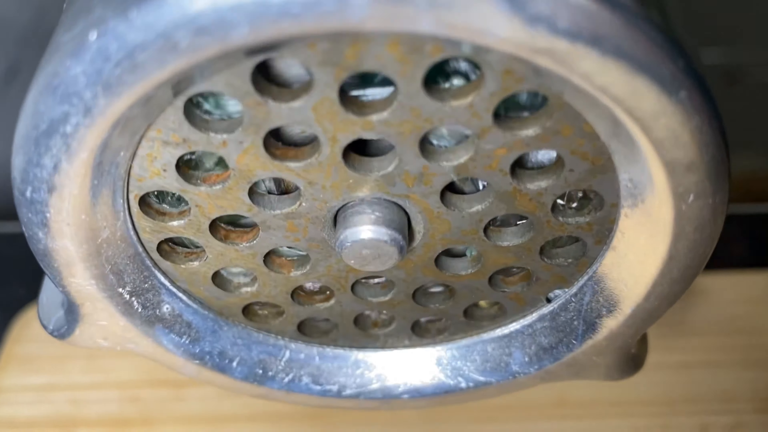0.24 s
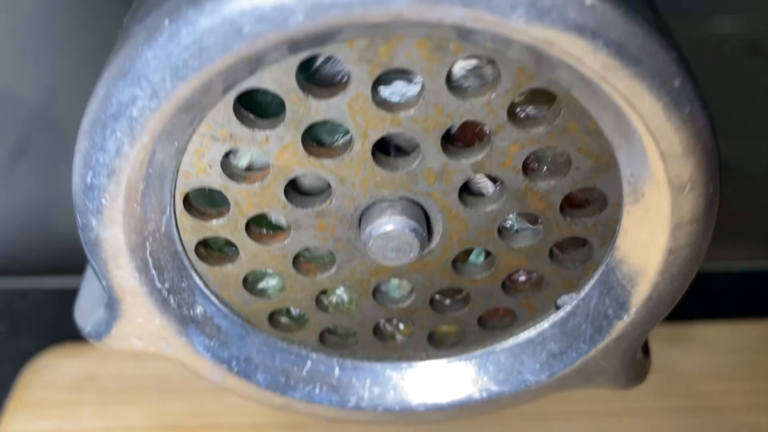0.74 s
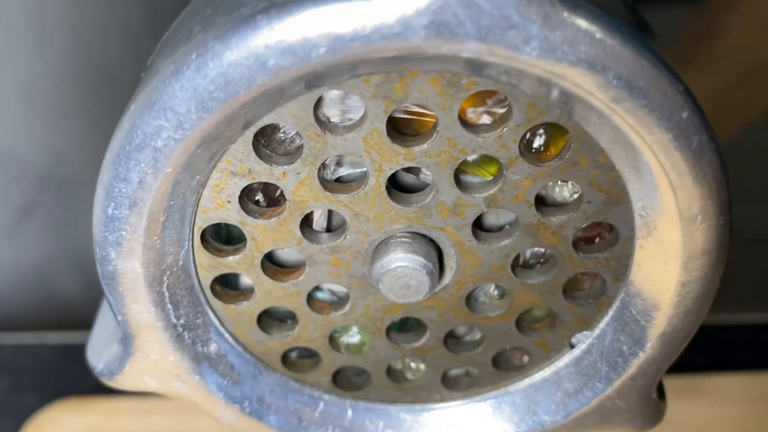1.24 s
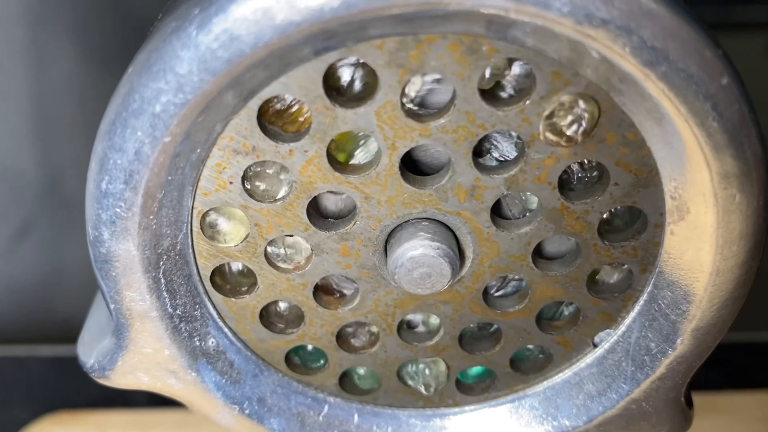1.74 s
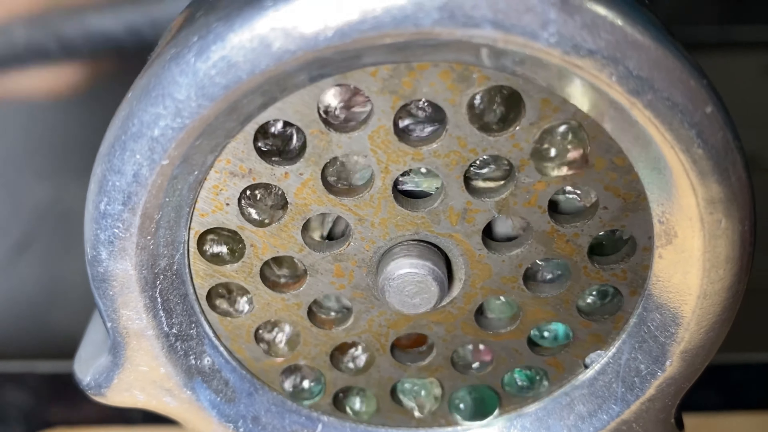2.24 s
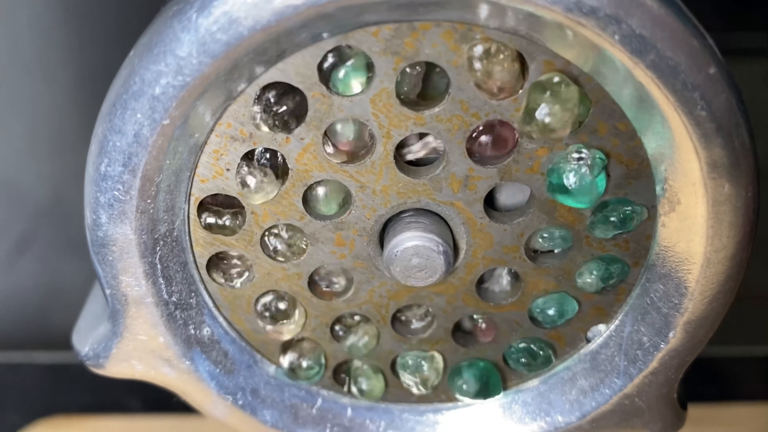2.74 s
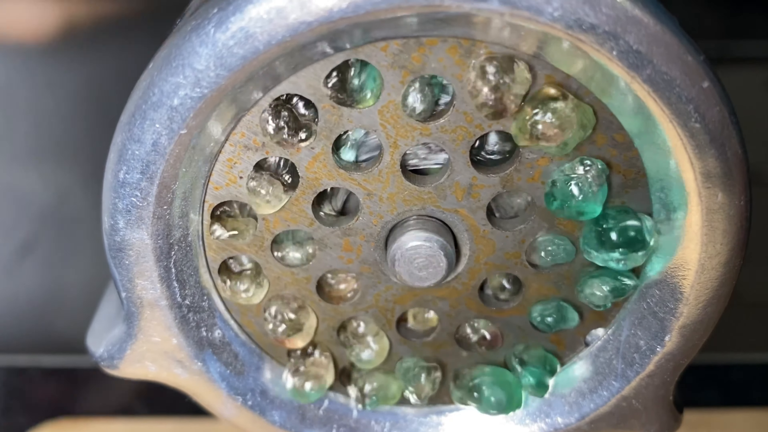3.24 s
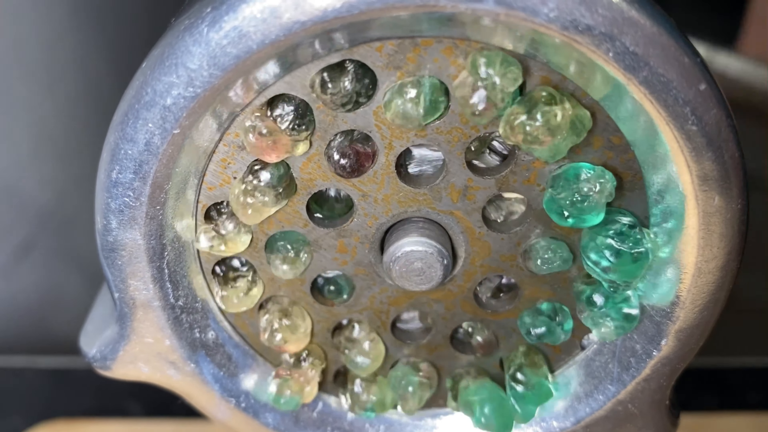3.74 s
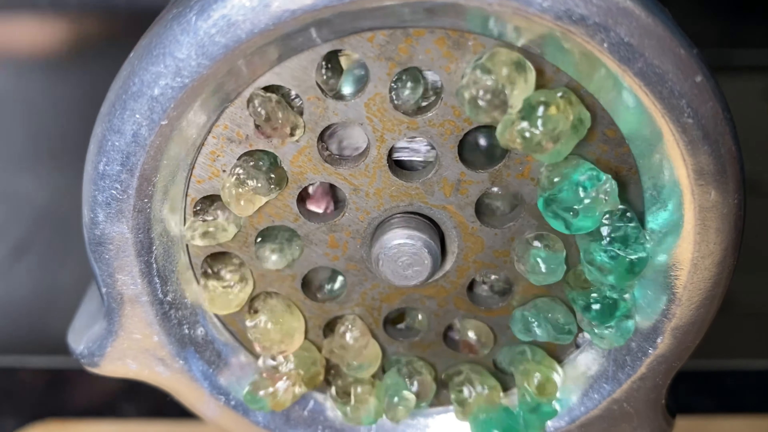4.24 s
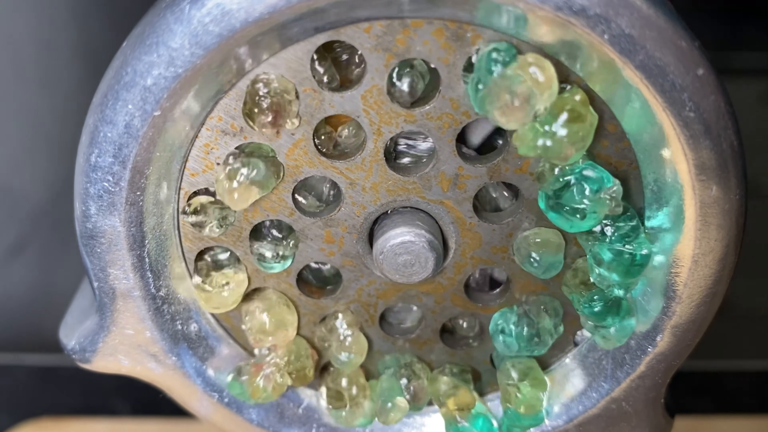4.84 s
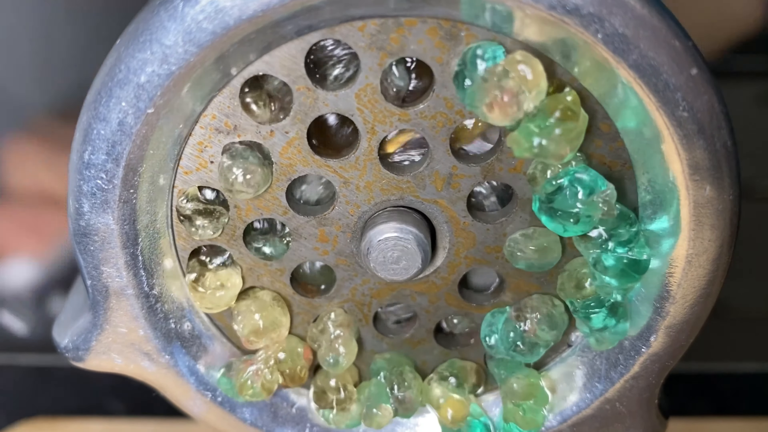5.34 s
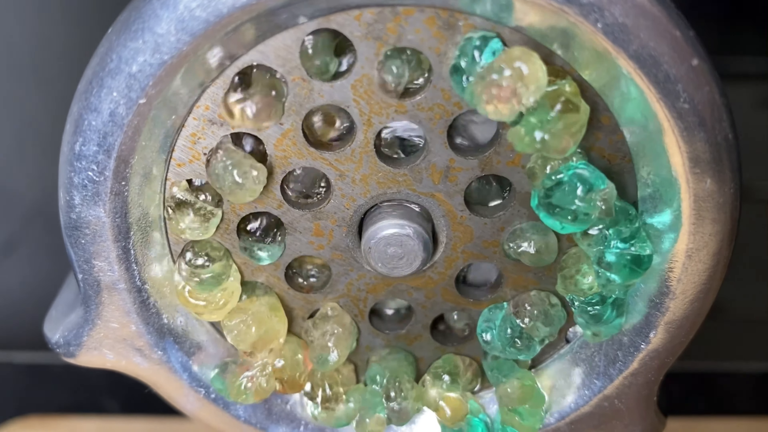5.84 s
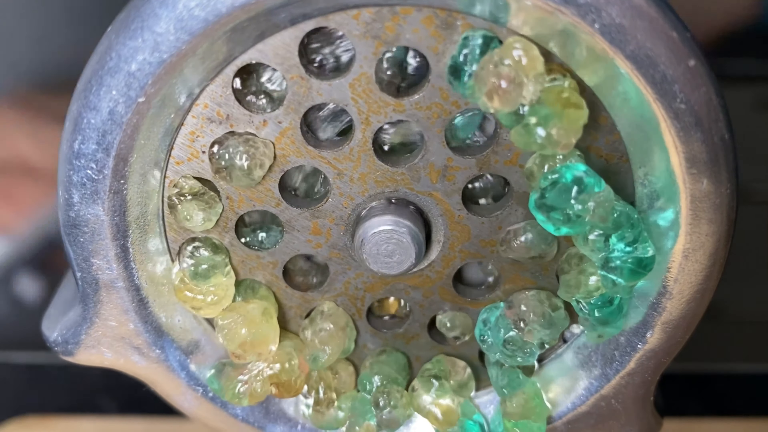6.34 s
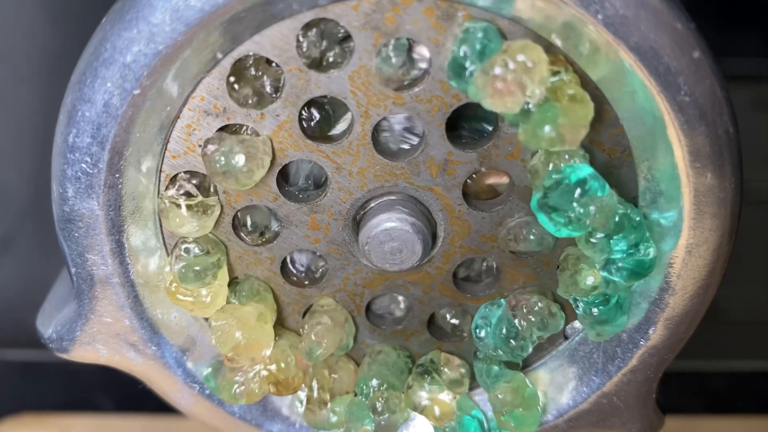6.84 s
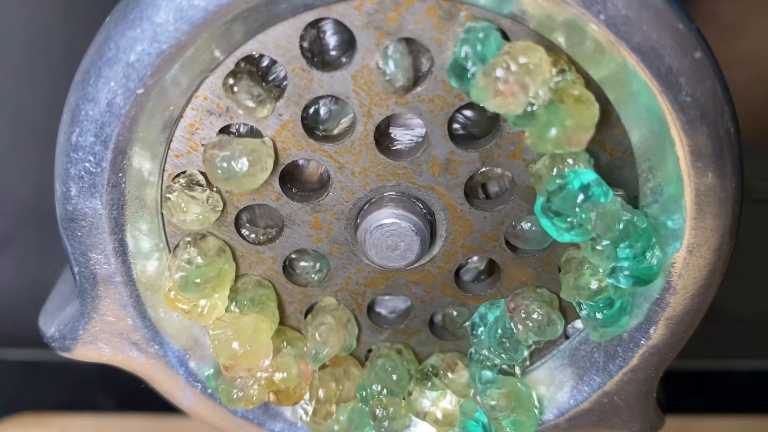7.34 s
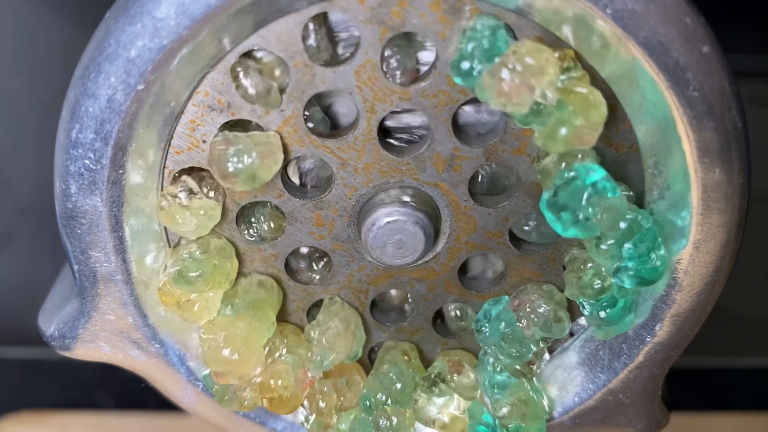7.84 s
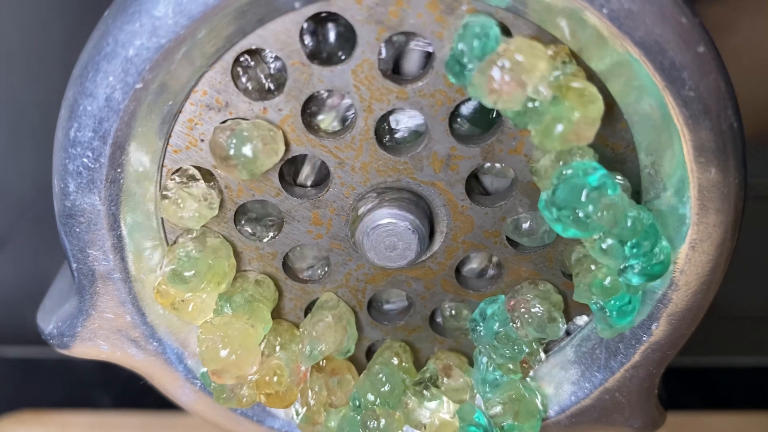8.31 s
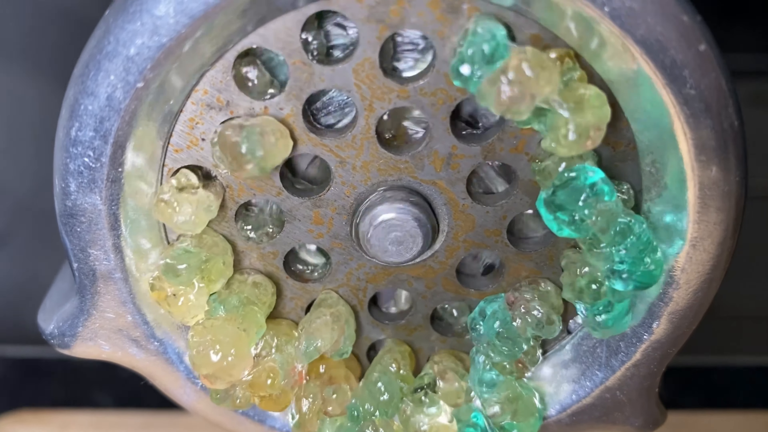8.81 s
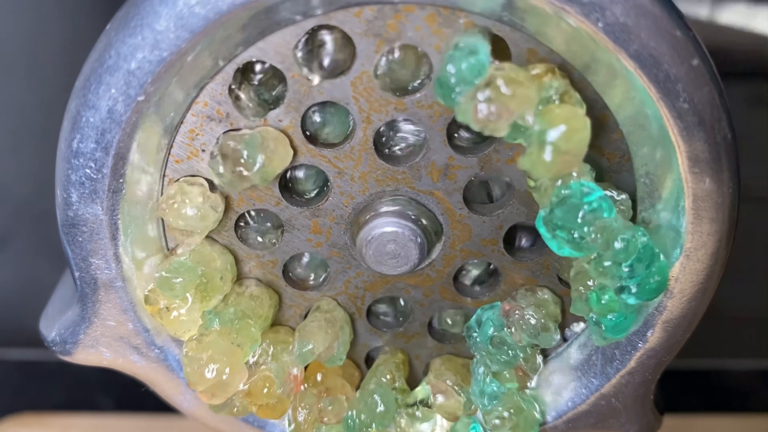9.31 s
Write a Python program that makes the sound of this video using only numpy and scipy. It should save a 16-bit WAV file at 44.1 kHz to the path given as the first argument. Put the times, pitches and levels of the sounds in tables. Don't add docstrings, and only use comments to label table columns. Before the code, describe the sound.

A metal grinder turns unevenly, humming and scraping while wet gum hisses, air pockets snap and the plate occasionally clanks in a small kitchen.

```python
import sys
import numpy as np
from scipy import signal
from scipy.fft import rfft, irfft, next_fast_len
from scipy.io import wavfile

SR = 44100
rng = np.random.default_rng(int(sys.argv[2]) if len(sys.argv) > 2 else 0)


def invert_db(x):
    u = np.asarray(x, float) / 20
    return 10 ** u


def to_wav(sig):
    pcm = np.clip(np.atleast_2d(sig), -1, 1) * 32767
    pcm = np.round(pcm).astype(np.int16)
    wavfile.write(sys.argv[1], SR, pcm.T)


N = 422037
HZ = np.fft.rfftfreq(next_fast_len(N + SR // 2), 1 / SR)


def rms_one(x):
    return x / np.sqrt(np.mean(x ** 2) + 1e-20)


def butter(x, order, edges_hz, kind):
    return signal.sosfilt(signal.butter(order, edges_hz, kind, fs=SR, output="sos"), x)


def power_sum(rows_db, rest_db=-70):
    return 10 * np.log10(invert_db(2 * rest_db) + np.sum(invert_db(2 * rows_db), axis=0))


def shaped(x, response):
    size = 2 * (len(HZ) - 1)
    return irfft(rfft(x, size) * response, size)[..., :N]


def colour(points):
    hz, db = np.transpose(points)
    return invert_db(np.interp(np.log(HZ + 1), np.log(hz), db))


def drift(rate):
    r = np.exp(-80 * np.pi * rate / SR)
    chance = rng.standard_normal(N // 40 + 2002)
    slow = signal.lfilter([1], [1, -2 * r, r * r], chance)[2000:]
    return np.interp(np.arange(N) / 40, np.arange(len(slow)), rms_one(slow))


def resonate(x, hz, width_hz):
    r = np.exp(-np.pi * width_hz / SR)
    poles = [1, -2 * r * np.cos(2 * np.pi * hz / SR), r * r]
    return signal.lfilter([(1 - r * r) / 2, 0, (r * r - 1) / 2], poles, x)


def ring(clicks, hz, t60):
    r, w = invert_db(-60 / (t60 * SR)), 2 * np.pi * hz / SR
    return signal.lfilter([0, np.sin(w)], [1, -2 * r * np.cos(w), r * r], clicks + 1e-18)


def friction(judder_db):
    judder = invert_db(judder_db * (drift(13.5) + 2.59 * drift(19.2)))
    return rms_one(rng.standard_normal((2, N)) * judder)


def grains(per_s, low_hz, high_hz, cycles, spread_db):
    sizes = invert_db(spread_db * np.minimum(rng.exponential(1, N), 2.5)) * rng.choice([-1, 1], N)
    born, dealt = rng.random(N) < per_s / SR, rng.integers(0, 10, N)
    total = np.zeros(N)
    for k, hz in enumerate(np.geomspace(low_hz, high_hz, 10)):
        total += ring(sizes * born * (dealt == k), hz, cycles / hz)
    return rms_one(total)


def patches(x, low_hz, high_hz, flicker_db):
    total = 0
    for k, hz in enumerate(np.geomspace(low_hz, high_hz, 7)):
        total = total + (-1) ** k * invert_db(flicker_db * drift(9.7)) * resonate(x, hz, 0.55 * hz)
    return rms_one(total)


def dying_noise(at, peak_db, t60, band_hz):
    blows = np.zeros(N)
    blows[at] = invert_db(peak_db)
    envelope = signal.lfilter([1], [1, -invert_db(-60 / (t60 * SR))], blows)
    noise = rng.standard_normal(N) + 1.27 * rng.standard_normal((2, N))
    return butter(envelope * noise, 2, band_hz, "band")


# start in seconds, end in seconds, metal rub level in dB, wet squish level in dB.
STROKES = [(-0.02, 0.7, -61.5, -62), (0.66, 1.754, -60, -63.5), (1.738, 2.94, -61, -69),
           (2.926, 3.998, -53, -62), (3.99, 4.667, -48, -61), (5.002, 5.557, -55.5, -64.5),
           (5.898, 6.736, -53.5, -63), (6.818, 7.676, -59, -72.5), (7.724, 8.223, -55, -67),
           (8.22, 9.417, -56.5, -63), (9.58, 10.03, -37.5, -53.5)]
# time in seconds, extra board shake in dB, extra scrape in dB.
BITES = [(.3, 3.5, -0.5), (.5, 4, 3), (1.01, -0.5, 6), (1.22, 4, 3.5), (1.44, 2, 3), (1.95, 5, -1),
         (2.262, 13, 9), (2.484, 11.5, 11.5), (2.666, 14.5, 15), (2.96, 2.5, 2), (3.13, 1.5, -2.5),
         (3.32, 1, -4.5), (3.72, 4, 1.5), (3.86, -12.5, -12.5), (4.06, 1.5, -0.5), (4.28, 4, 2),
         (4.62, 4.5, 7), (4.82, -9.5, -4.5), (4.93, 10, 3.5), (5.27, 4, -1), (5.92, 5, 1), (6.28, 6.5, 4),
         (6.64, 7, 9), (7.078, 11, 9.5), (7.49, 5, 4), (7.76, 5, 3), (8.08, 10, 4), (8.42, 4, 1.5),
         (8.63, 6.5, 3), (9.242, 4, 5)]
STROKE_RISE_S, STROKE_FALL_S, SLACK_DB, WET_SLACK_SHARE = 0.023, 0.19, 8.5, 0.74
BITE_S, RUMBLE_DB, RUMBLE_FOLLOWS, SQUISH_FOLLOWS = 0.09, -49.5, 0.42, 1.05


def turning():
    t = np.arange(N // 64 + 2) * 64 / SR
    start, end, rub_db, wet_db = np.transpose(STROKES)[:, :, None]
    grip = np.minimum((t - start) / STROKE_RISE_S, (end - t) / STROKE_FALL_S)
    slack_db = SLACK_DB * (1 - np.clip(grip, -3, 1))
    s, shake_db, scrape_db = np.transpose(BITES)[:, :, None]
    bump = np.exp(-((t - s) / BITE_S) ** 2)
    load_db = power_sum(rub_db - slack_db)
    scrape_db = np.sum(scrape_db * bump, axis=0)
    rumble_db = RUMBLE_DB + RUMBLE_FOLLOWS * (load_db + 59.5) + np.sum(shake_db * bump, axis=0)
    squish_db = power_sum(wet_db - WET_SLACK_SHARE * slack_db) + SQUISH_FOLLOWS * scrape_db
    return [np.interp(np.arange(N) / SR, t, db) for db in (rumble_db, load_db + scrape_db, squish_db)]


# peak time in seconds, peak level in dB, rise in seconds, fall in seconds.
DRAGS = [(0.06, -44, 0.035, 0.25), (0.27, -41, 0.031, 0.12), (0.54, -37.5, 0.14, 0.097),
         (0.79, -38.5, 0.12, 0.051), (0.92, -37, 0.15, 0.07), (1.148, -39.5, 0.016, 0.084),
         (1.25, -39.5, 0.049, 0.056), (1.32, -41, 0.12, 0.094), (1.45, -40.5, 0.086, 0.22),
         (1.88, -41, 0.19, 0.13), (2.12, -34.5, 0.13, 0.079), (2.38, -29, 0.18, 0.14),
         (2.62, -36.5, 0.39, 0.18), (2.97, -40.5, 0.018, 0.17), (3.31, -34, 0.36, 0.023),
         (3.42, -31, 0.099, 0.092), (3.77, -40, 0.49, 0.092), (4.12, -31.5, 0.095, 0.07),
         (4.31, -28, 0.098, 0.16), (4.43, -32.5, 0.035, 0.21), (5.14, -35, 0.29, 0.11),
         (5.37, -39, 0.17, 0.2), (6.02, -37.5, 0.095, 0.54), (6.4, -27.5, 0.25, 0.16),
         (6.63, -41, 0.025, 0.4), (6.96, -40, 0.11, 0.077), (7.13, -36, 0.096, 0.23),
         (7.639, -40, 0.028, 0.076), (7.86, -38, 0.038, 0.021), (7.77, -32, 0.02, 0.05),
         (8.09, -34, 0.35, 0.095), (8.65, -38.5, 0.24, 0.016), (8.85, -35, 0.14, 0.15),
         (9.38, -39, 0.36, 0.055)]
DRAG_DROP_DB, DRAG_CURVE, HUM_REST_DB = 20.5, 1.74, -55


def dragging():
    t = np.arange(N // 64 + 2) * 64 / SR
    s, peak_db, rise, fall = np.transpose(DRAGS)[:, :, None]
    away = np.abs(t - s) / np.maximum(np.where(t < s, rise, fall), .01)
    level_db = power_sum(peak_db - DRAG_DROP_DB * away ** DRAG_CURVE, HUM_REST_DB)
    return np.interp(np.arange(N) / SR, t, level_db)


HUM_HZ, HUM_WIDTH_HZ = 257.7, 6.1


def hum(level_db):
    pitch = HUM_HZ + 4 * drift(9)
    tone = np.sqrt(2) * np.sin(2 * np.pi * np.cumsum(pitch) / SR) * invert_db(1.6 * drift(12))
    skirt = rms_one(resonate(rng.standard_normal((2, N)), HUM_HZ, HUM_WIDTH_HZ))
    return invert_db(level_db) * (tone * [[1], [.4]] + invert_db(-10.0) * skirt)


# frequency in Hz, width in Hz, level in dB.
BOARD = [(46, 4.1, -9.5), (71.7, 31, 0), (127.8, 39.5, 4.5), (172, 17, -5), (211.7, 18, 4)]


def rumble(level_db):
    shake = friction(judder_db=1.0)
    modes = 0
    for hz, width, db in BOARD:
        modes = modes + invert_db(db + 3.1 * drift(4.6)) * resonate(shake, hz, width) / np.sqrt(width)
    return invert_db(level_db) * rms_one(butter(modes, 2, 260, "low"))


# frequency in Hz, width in Hz, level in dB.
BARREL = [(367.4, 3.5, 15.5), (480, 15.3, 4.5), (614, 27.7, 9), (872.5, 19, 6), (1260, 125, -4.5),
          (1765, 15, -4.5), (448, 22, 1), (2820, 57, -16)]
# frequency in Hz, level in dB per Hz.
SCRAPE = [(40, -18.5), (150, 1.5), (300, 5.5), (600, -1.5), (1200, 5), (2400, -8), (3600, -56.5)]


def rub(level_db):
    slips = friction(judder_db=1.3)
    modes = sum(invert_db(db + 3.1 * drift(14.2)) * resonate(slips, hz, width) for hz, width, db in BARREL)
    clumps_per_s = 110 * invert_db(2.0 * drift(6.1))
    crunch = grains(clumps_per_s, low_hz=455.0, high_hz=2417, cycles=96.0, spread_db=8.5)
    scrape = patches(shaped(slips, colour(SCRAPE)), low_hz=200, high_hz=3300, flicker_db=4.5)
    mix = invert_db(1.5) * rms_one(modes) + invert_db(-6) * crunch * [[1], [.6]] + invert_db(-7) * scrape
    return invert_db(level_db) * mix


# frequency in Hz, level in dB per Hz.
SQUISH = [(1500, 19.5), (3000, 3), (4500, 4), (6000, 9), (7500, 3), (10000, 11.5), (12000, -14.5),
          (15500, -5), (16200, -41)]


def squish(level_db):
    wet = shaped(friction(judder_db=1.0), colour(SQUISH))
    hiss = patches(wet, low_hz=2593, high_hz=12850, flicker_db=0.87)
    ticks = grains(per_s=55, low_hz=2500, high_hz=12000, cycles=4.0, spread_db=4.0)
    top_cut = signal.cheby2(10, 50, 16000, fs=SR, output="sos")
    return invert_db(level_db + 5.5) * signal.sosfilt(top_cut, hiss + invert_db(-12.5) * ticks * [[1], [0]])


AIR_DB, AIR_TOP_DB = -85.5, -83


def air():
    hiss = rng.standard_normal((2, N))
    broad = butter(hiss, 3, [10300, 13900], "band")
    top = butter(hiss, 4, [15150, 15900], "band")
    return invert_db(AIR_DB) * rms_one(broad) + invert_db(AIR_TOP_DB + 3.0 * drift(4)) * rms_one(top)


# time in seconds, peak level in dB, loudest resonance in Hz.
CRUSHES = [(0.119, -39, 640), (0.714, -39, 1380), (1.32, -38, 653), (1.405, -33, 910), (1.939, -40, 577),
           (2.231, -37, 666), (2.938, -40, 600), (3.224, -43, 645), (3.364, -47, 650), (3.653, -19.5, 1160),
           (3.79, -24, 1167), (3.922, -38.5, 590), (4.115, -55, 606), (4.18, -37, 640), (4.255, -25, 647),
           (4.403, -30.5, 1020), (4.497, -31.5, 630), (4.629, -35, 480), (4.914, -32.5, 454),
           (5.286, -38, 570), (5.645, -40, 610), (6.296, -36, 1060), (6.429, -30.5, 1170),
           (6.842, -42, 647), (6.937, -35.5, 614), (7.35, -45, 645), (7.486, -34, 620), (7.938, -31.5, 585),
           (8.054, -50, 610), (8.308, -23.5, 1150), (8.439, -33, 505), (8.58, -34, 596), (8.73, -36, 620),
           (9.216, -14.5, 1225)]
CRUSH_T60_S, CRUSH_WIDTH_HZ, CRUSH_DB, CRUSH_WALL_DB = 0.067, 84, -3.5, -13


def crushes():
    out, t = np.zeros((2, N + 8192)), np.arange(8192) / SR
    shape = (1 - np.exp(-t / 0.0019)) * invert_db(-60 * t / CRUSH_T60_S)
    for (s, peak_db, hz), grind in zip(CRUSHES, rng.standard_normal((len(CRUSHES), 2, 8192))):
        own = rms_one(resonate(grind, hz, CRUSH_WIDTH_HZ))
        others = [resonate(grind, hz * ratio, CRUSH_WIDTH_HZ * ratio) for ratio in (1.42, 2.03, 2.85)]
        body = own + invert_db(CRUSH_WALL_DB) * rms_one(sum(others))
        at = round(s * SR)
        out[:, at:at + 8192] += invert_db(peak_db + CRUSH_DB) * shape * body * [[1], [.6]]
    return out[:, :N]


# time in seconds, peak level in dB, pocket frequency in Hz, snap level in dB re the peak.
BURSTS = [(0.7133, -18.5, 2130, -34), (1.0552, -17.5, 9100, -14), (1.8045, -21, 2060, -15),
          (2.8298, -18.5, 6900, -39), (2.9894, -23.5, 9250, -33), (3.1035, -40, 8150, -30),
          (3.2253, -6, 4270, -57), (3.5529, -18, 6450, -42), (3.653, -6, 2060, -38),
          (3.6938, -19, 3120, -5), (3.7899, -8.5, 2060, -57), (4.9151, -6, 15100, -35),
          (5.336, -30.5, 13300, -3), (5.8413, -26, 8800, 1.5), (5.8584, -26, 12900, -1.5),
          (6.2104, -12.5, 6360, -4.5), (6.2964, -13.5, 2040, -43), (6.3917, -24, 7700, -14),
          (6.8004, -23, 10800, -10), (6.986, -16.5, 12300, -6.5), (7.108, -15.5, 11400, -16),
          (7.359, -24.5, 7060, -3.5), (7.637, -19.5, 7600, -9), (7.9385, -9, 2740, -7),
          (8.4379, -10.5, 4320, 0), (8.5802, -18, 4800, -3), (8.8643, -26.5, 3020, -3),
          (9.217, -6, 2500, -7), (9.308, -30, 2820, 6), (9.393, -28, 8800, -41)]
# time in seconds, peak level in dB, pocket frequency in Hz, ringing in cycles.
TWIN_POPS = [(3.2254, -8.5, 5200, 9.7), (3.644, -23, 5900, 4.1), (3.6935, -41, 6760, 5.7),
             (7.9393, -15, 6600, 11), (8.437, -10.5, 8800, 20), (8.5802, -27, 6950, 33),
             (9.2155, -2, 8000, 4), (9.224, -7.5, 8700, 11), (9.2296, -24, 6350, 9.0),
             (0.7133, -19.5, 4400, 4.7), (9.218, -16, 4100, 12)]
# time in seconds, peak level in dB, pocket frequency in Hz.
BUBBLES = [(2.099, -32, 1960), (2.5126, -25.5, 4870), (2.598, -30, 5030), (2.7845, -30, 6600),
           (2.8673, -35, 4350), (2.938, -37, 2860), (2.9529, -31, 4200), (3.02, -25, 8100),
           (3.141, -43, 2310), (3.6133, -23.5, 7700), (3.8941, -29.5, 5500), (4.547, -29.5, 5100),
           (4.63, -31, 2070), (6.249, -31.5, 5780), (6.4264, -26, 1960), (6.8584, -25.5, 2020),
           (7.4863, -24, 1860), (8.0514, -27.5, 7850), (8.1578, -26, 8750), (8.308, -25, 2340),
           (8.838, -35, 3600)]
# time in seconds, peak level in dB, pocket frequency in Hz.
THREADS = [(0.119, -33.5, 4300), (0.7412, -33.5, 8700), (1.1472, -36, 2330), (1.39, -35, 2220),
           (1.6128, -30, 6800), (1.89, -35.5, 7300), (2.4994, -33, 5230), (3.114, -30, 3080),
           (3.3022, -39, 6860), (3.42, -39, 2390), (3.925, -43, 5530), (4.2137, -33.5, 3020),
           (4.9914, -33, 7700), (5.398, -39, 4140), (5.9058, -35.5, 4100), (6.09, -31, 2480),
           (6.489, -30, 1810), (6.6834, -29.5, 5700), (7.906, -38.5, 7060), (8.5624, -41, 4150),
           (8.7142, -32.5, 6000), (8.8145, -27.5, 3100), (8.945, -36.5, 2110), (9.1523, -39, 7170),
           (9.417, -38.5, 3100), (9.4877, -37, 8500)]
# time in seconds, peak level in dB, pocket frequency in Hz.
TICKS_EARLY = [(0.1195, -33, 4350), (0.2678, -35, 8010), (0.2807, -35, 11840), (0.5376, -31, 2410),
               (0.639, -35, 8550), (0.7244, -30, 8440), (0.7412, -40, 8100), (0.836, -33, 10850),
               (0.8458, -43, 7920), (1.0553, -18, 11700), (1.148, -24, 11500), (1.3903, -28, 11800),
               (1.5751, -42, 8050), (1.6707, -36, 8660), (1.7035, -41, 6800), (1.8115, -30, 2300),
               (1.9355, -33, 7250), (2.0164, -39, 8350), (2.7158, -37, 4480), (2.7255, -29, 8350),
               (2.7472, -39, 4570), (2.8299, -22, 6970), (2.8686, -41, 4310), (2.8765, -29.5, 5430),
               (2.8966, -37, 8480), (2.9378, -25, 2800), (2.953, -21.5, 4380), (2.9763, -31, 8790),
               (3.0515, -38, 7880), (3.1035, -21, 8140), (3.1388, -30.5, 2500), (3.232, -31, 4440),
               (3.4022, -36, 2890), (3.421, -34.5, 7200), (3.532, -37, 5680), (3.6607, -19, 6360),
               (3.7748, -33, 2930), (3.79, -22.5, 4320), (3.9392, -34, 5500), (3.948, -40, 2200),
               (4.054, -30, 5360), (4.1774, -29.5, 8530), (4.3291, -35, 4870), (4.634, -26, 1780),
               (4.7, -37, 5380), (4.7324, -37, 7150), (4.7697, -48, 1380), (4.7889, -35, 2100),
               (4.869, -32.5, 3100), (4.9582, -32, 7100)]
TICKS_LATE = [(5.0677, -31.5, 2090), (5.2996, -48, 1770), (5.3266, -42, 4870), (5.336, -20, 13090),
              (5.3632, -39, 3320), (5.3759, -36, 1540), (5.4547, -40, 5700), (5.5981, -37, 6500),
              (5.6939, -42, 5560), (5.809, -33, 5740), (5.823, -28, 7060), (5.913, -31.5, 11500),
              (6.006, -30, 13140), (6.101, -42, 2020), (6.1454, -33, 5830), (6.2771, -30, 5800),
              (6.506, -46, 1640), (6.548, -29, 7100), (6.6176, -27, 1410), (6.684, -29, 2780),
              (6.749, -35, 5740), (6.8083, -46, 5600), (6.8435, -34, 1420), (6.906, -26, 11900),
              (6.9693, -34, 4220), (7.0121, -28, 13310), (7.0479, -30, 1460), (7.0617, -27.5, 5660),
              (7.154, -41, 2900), (7.205, -36, 11100), (7.454, -42, 6040), (7.4964, -32, 1890),
              (7.614, -45, 4020), (7.7728, -31, 5510), (7.784, -21, 1730), (7.7953, -31, 7700),
              (7.9568, -34, 2970), (8.173, -29, 7800), (8.2959, -32, 15680), (8.322, -23, 6750),
              (8.3603, -30, 2730), (8.445, -17, 8790), (8.479, -24.5, 1490), (8.5092, -32, 3100),
              (8.535, -33, 2970), (8.73, -24.5, 1760), (8.8732, -22, 1960), (8.8833, -29, 1770),
              (8.9204, -39, 2500), (8.958, -27, 12700), (8.996, -27, 15590), (9.01, -34, 8270),
              (9.0335, -37, 7190), (9.1075, -39, 5860), (9.209, -30, 5800), (9.3795, -35, 7900),
              (9.3925, -16.5, 8550), (9.4127, -42, 5600), (9.4623, -48, 7000), (9.4875, -39, 8610)]
BUBBLE_SNAP_DB, THREAD_SNAP_DB = -28, 3
TICK_SNAP_DB, TICK_CYCLES = -7.5, 6.8


def pops():
    out, t = np.zeros((2, N + 512)), np.arange(512) / SR
    small = [(*row, BUBBLE_SNAP_DB) for row in BUBBLES] + [(*row, THREAD_SNAP_DB) for row in THREADS]
    rows = [(*row, 6.0) for row in list(BURSTS) + small]
    rows += [(s, db, hz, -40, cycles) for s, db, hz, cycles in TWIN_POPS]
    ticks = list(TICKS_EARLY) + list(TICKS_LATE)
    rows += [(s, db - 4.0, hz, TICK_SNAP_DB, TICK_CYCLES) for s, db, hz in ticks]
    for (s, peak_db, hz, snap_db, cycles), draw in zip(rows, rng.standard_normal((len(rows), 514))):
        turns = t * hz
        swell = (1 - np.exp(-2.4 * turns)) * invert_db(-30 * turns / (cycles * invert_db(draw[0])))
        rising = np.sin(2 * np.pi * turns * (0.93 + 0.015 * turns))
        overtone = 0.24 * np.sin(2 * np.pi * turns * 1.12 * invert_db(2.1 * draw[1]))
        snap = (draw[2:] - 0.17 * draw[1:-1]) * invert_db(-60 * t / 0.0033)
        rustle = draw[2:] * swell ** 3.8
        pop = 1.59 * swell * (rising + overtone) + invert_db(snap_db) * snap + invert_db(-27) * rustle
        pop = invert_db(peak_db) * pop
        lag = 18 + round(.6 * np.clip(draw[2], -2, 2))
        echoed = pop + 0.11 * np.roll(pop, lag)
        at = round((s + .0006) * SR)
        out[:, at:at + 512] += invert_db([[1.2 * draw[3]], [-.9 * draw[3]]]) * echoed
    return butter(out[:, :N], 2, 1200, "high")


# time in seconds, peak level in dB, bright share in dB, crunch share in dB.
KNOCKS = [(0.713, -48.5, 7.5, -22), (1.804, -52, -0.5, -2), (3.653, -24, -5, -9), (3.661, -31, -21, -31),
          (3.694, -49, -38, -21), (3.706, -27.5, -39, -31), (3.789, -35.5, -13, 1.5),
          (3.798, -29, -11.5, -37), (6.299, -29.5, -48, -18), (6.86, -39.5, -29, -7.5),
          (7.486, -35.5, -27, -11), (7.498, -35.5, -28, -24), (7.783, -39, -17, -33),
          (8.308, -24.5, -13.5, -33), (9.217, -21, -4, -6), (9.223, -28, 4.5, -23), (9.23, -21.5, -2, -37)]
# frequency in Hz, level in dB, t60 in seconds.
PLATE_LOW = [(640, -14, 0.15), (945, -12, .12), (1110, -13, .25), (1187, 2, .27), (1400, -14, .15),
             (1720, -11, 0.11), (2150, -8, 0.1), (2420, -12, .15), (2770, -6, 0.42), (3100, -11, 0.13),
             (3420, -16, .2)]
PLATE_HIGH = [(4260, 11, 0.12), (5380, 5, 0.091), (6270, 21.5, 0.04), (6900, 17, 0.058), (8100, 14, 0.07),
              (10200, 14, 0.059)]
LONG_RING_DB = -11.5
RING_GROWS = .5


def knocks():
    s, peak_db, bright_db, crunch_db = np.transpose(KNOCKS)
    at, out = np.round((s + .0006) * SR).astype(int), np.zeros(N)
    chatter = invert_db(2.2 * drift(45))
    for modes, share_db in ((PLATE_LOW, -7 + 0 * s), (PLATE_HIGH, bright_db - 12.0)):
        for hz, db, t60 in modes:
            clicks = np.zeros(N)
            luck_db = rng.normal(0, 2.0, len(at))
            clicks[at] = invert_db(peak_db + share_db + db + luck_db)
            out += ring(clicks, hz, t60 / 8)
            clicks[at] *= invert_db(LONG_RING_DB + RING_GROWS * hz / 1000 * np.minimum(peak_db + 20, 0))
            pair = ring(clicks, hz * 1.012, t60 * 1.3) + ring(clicks, hz * 0.978, t60 * 0.69)
            out += pair * np.roll(chatter, round(hz))
    rattle = dying_noise(at, peak_db + bright_db - 12.0, t60=0.23, band_hz=[3600, 8800])
    crunch = dying_noise(at, peak_db + crunch_db, t60=0.26, band_hz=[700, 3600])
    coloured = sum(invert_db(db + 12) * resonate(crunch, hz, 90) for hz, db, t60 in PLATE_LOW)
    return out + rattle + 0.21 * crunch + coloured


# middle in seconds, half length in seconds, level in dB, frequency in Hz.
SQUEAKS = [
    (1.447, 0.079, -48.5, 1230),
    (1.79, 0.049, -53, 1756),
    (4.414, 0.041, -43.5, 1555),
    (4.024, 0.038, -51, 1820),
    (7.768, 0.039, -47, 1560),
    (8.265, 0.023, -56, 1830),
    (8.647, 0.021, -45, 1424),
]
SQUEAK_WIDTH_HZ = 105


def squeaks():
    out, slips = np.zeros(N), friction(judder_db=2.5)[0]
    for s, half, db, hz in SQUEAKS:
        near = np.arange(round((s - 2 * half) * SR), round((s + 2 * half) * SR))
        rough = 0
        for k in (1, 1.14, 1.32):
            once = resonate(slips[near], hz * k, SQUEAK_WIDTH_HZ)
            rough = rough + resonate(once, hz * k, SQUEAK_WIDTH_HZ) / k ** 2
        out[near] += invert_db(db) * np.exp(-((near / SR - s) / half) ** 4) * rms_one(rough)
    return out


# time in seconds, peak level in dB.
THUDS = [
    (3.694, -33),
    (3.923, -46),
    (4.915, -38.5),
    (8.051, -46.5),
    (8.436, -36),
]


def thuds():
    s, peak_db = np.transpose(THUDS)
    pushes = np.zeros(N)
    pushes[np.round((s + .0008) * SR).astype(int)] = invert_db(peak_db + 35.5)
    return butter(pushes + 1e-18, 1, [130, 1800], "band")


KITCHEN_T60_S, KITCHEN_CUT_HZ, KITCHEN_DB = 0.41, 3700, -30.5


def kitchen(x):
    t = np.arange(SR // 3) / SR
    tail = rng.standard_normal((2, len(t))) * invert_db(-60 * t / KITCHEN_T60_S) * (t > .007)
    tail = butter(tail, 1, [300, KITCHEN_CUT_HZ], "band")
    tail = tail / np.sqrt(np.sum(tail ** 2) / 2)
    return invert_db(KITCHEN_DB) * signal.fftconvolve(x[None], tail, axes=1)[:, :N]


# frequency in Hz, left's lead in radians,
# left-right balance in dB, likeness of the steady sound from 0 to 1.
PAIR = [(0, 0, -2.4, .93), (105, 0, -2.6, .93), (170, .2, 3, .3), (260, .55, -1.8, .85),
        (640, .9, 1.2, .55), (1300, 2.4, 2.6, .4), (2300, 2.0, 3.6, .35), (3200, .7, 2.6, .6),
        (6000, .6, 1.9, .6), (7750, 0, .4, .985), (17000, -12.9, 0, .997), (23000, -21.3, 0, .995)]


def microphones(left_right):
    hz, lead, balance_db, alike = np.transpose(PAIR)
    tilt = invert_db(np.interp(HZ, hz, balance_db) / 2)
    return shaped(left_right, np.array([tilt * np.exp(1j * np.interp(HZ, hz, lead)), 1 / tilt]))


def scene():
    rumble_db, rub_db, squish_db = turning()
    grinding = hum(dragging()) + rumble(rumble_db) + rub(rub_db) + squish(squish_db)
    direct, scattered = grinding + air() + crushes()
    alike = np.interp(HZ, np.array(PAIR)[:, 0], np.array(PAIR)[:, 3])
    middle = shaped(direct, np.sqrt((1 + alike) / 2))
    side = shaped(scattered, np.sqrt((1 - alike) / 2))
    steady = middle + side * [[1], [-1]]
    hits = pops() + knocks() + thuds()
    return microphones(steady + hits + squeaks() + kitchen(hits.mean(axis=0)))


def band_limit(x):
    return signal.sosfilt(signal.butter(12, 17700, fs=SR, output="sos"), x)


def record(dry):
    cut = butter(dry, 8, 38, "high")
    cut = signal.sosfilt(signal.cheby2(12, 70, 17400, fs=SR, output="sos"), cut)
    return band_limit(cut)


dry = scene()
out = record(dry)
to_wav(out)
```